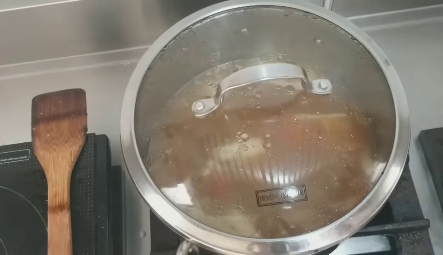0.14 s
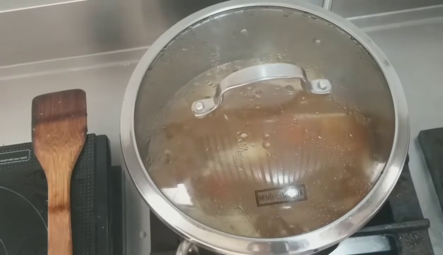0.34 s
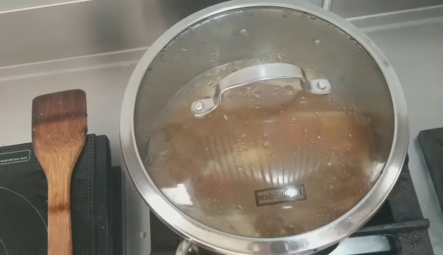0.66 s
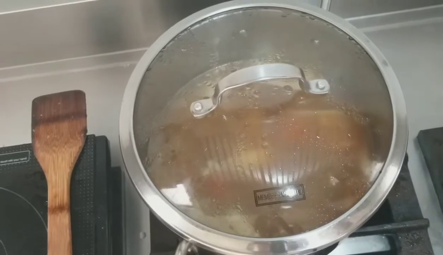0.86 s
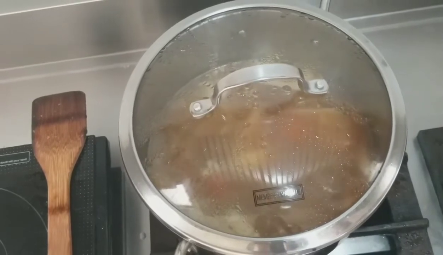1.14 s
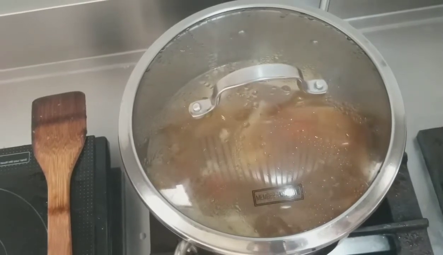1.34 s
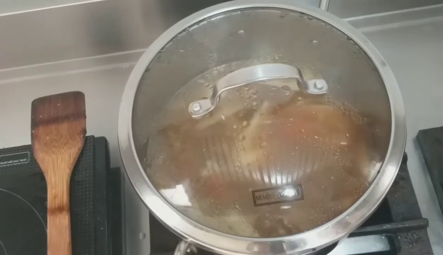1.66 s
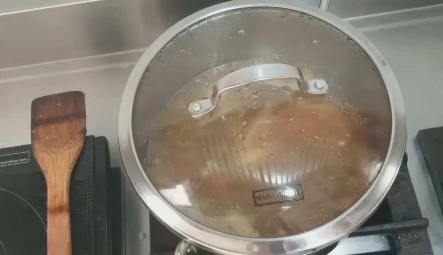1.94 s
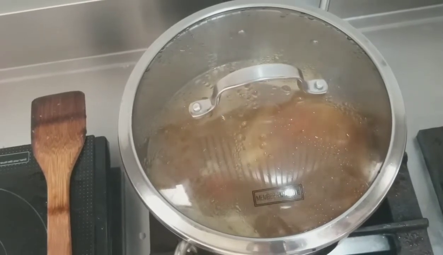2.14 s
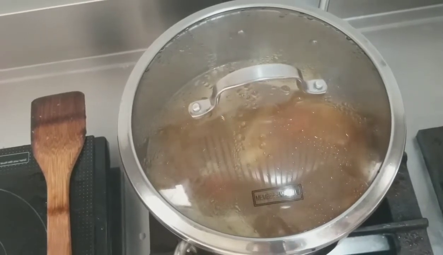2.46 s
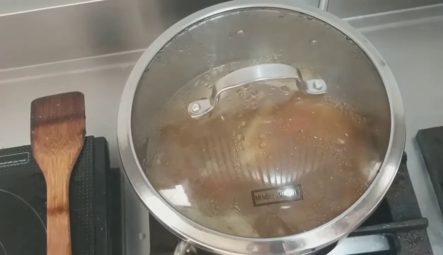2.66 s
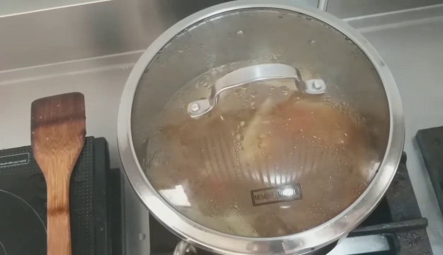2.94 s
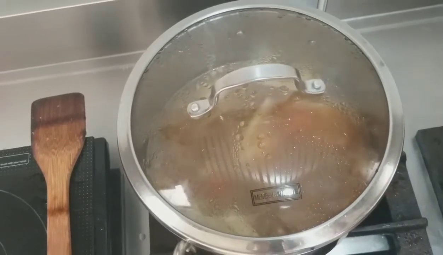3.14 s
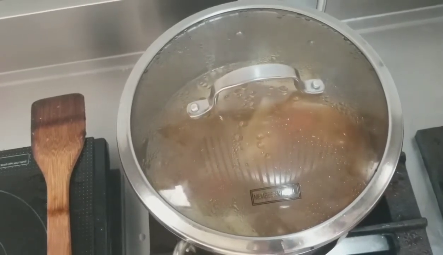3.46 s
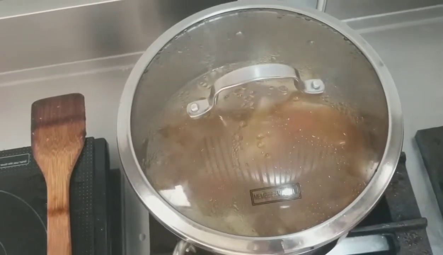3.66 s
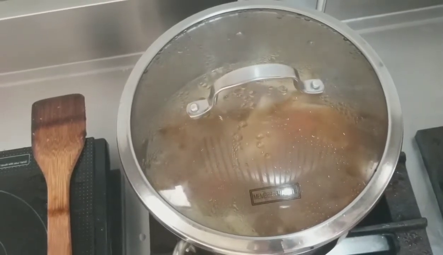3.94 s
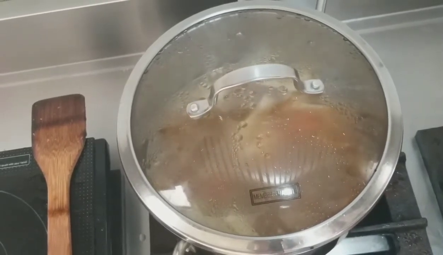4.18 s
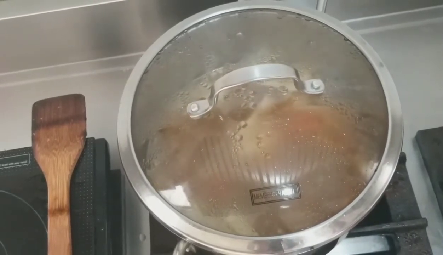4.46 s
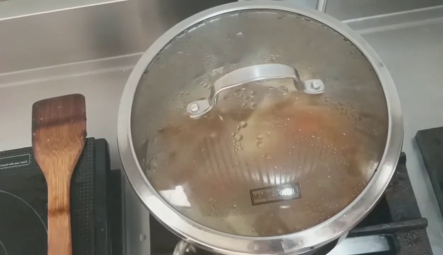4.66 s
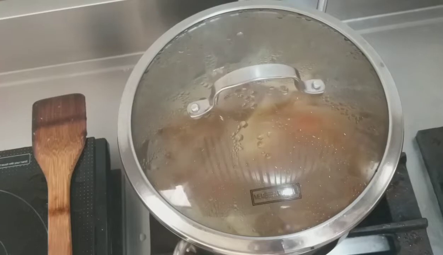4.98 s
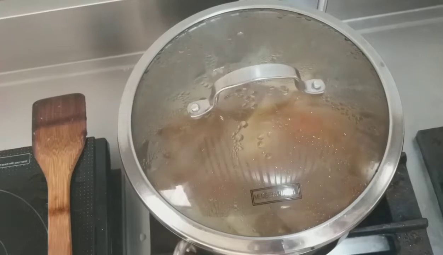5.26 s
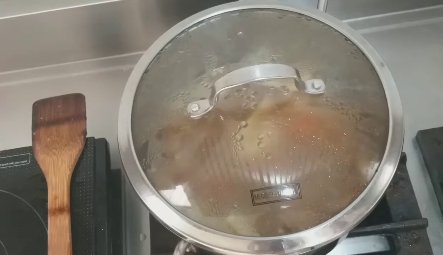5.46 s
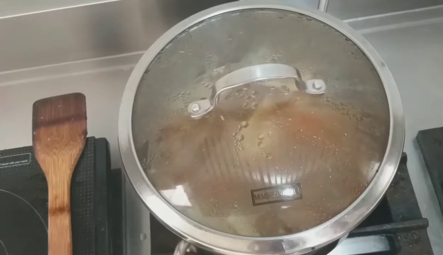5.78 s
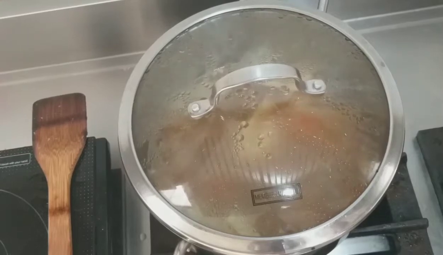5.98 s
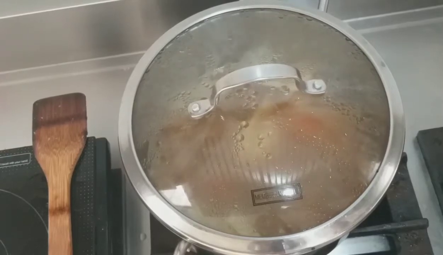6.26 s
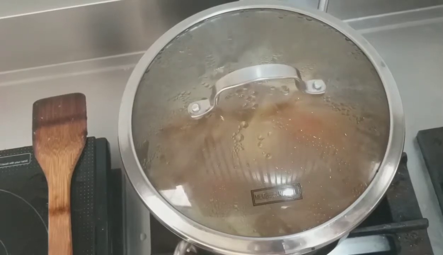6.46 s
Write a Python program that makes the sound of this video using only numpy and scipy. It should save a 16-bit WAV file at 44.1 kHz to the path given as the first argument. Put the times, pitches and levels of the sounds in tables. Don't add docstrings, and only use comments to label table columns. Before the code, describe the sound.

From 0 s a bright, dense sizzle is already at full strength: fish frying in hot oil under a glass lid, heard close by. Thousands of tiny crackles, strongest around 3 to 5 kHz, clump into uneven flurries over fine hiss, with a short ring from the air under the lid. Pops, dry snaps and lower bubble plops scatter throughout; thin, very high ticks mark droplets on the lid. Around 0.5 s a quiet low burner rumble swells, holds unevenly, then fades from about 5.7 s. Frying grows slightly stronger near 2.6 s and eases around 4 s. Sharp spits recur, notably at 2.7, 3.2, 3.55 and 5.6 s, each making the phone microphone duck everything for a few hundredths of a second. Pops cluster at 4.2 to 4.9 s. The frying continues unbroken to the end at about 6.6 s, nearly mono, with little room echo.

```python
import sys
import numpy as np
from scipy import signal
from scipy.fft import rfft, irfft
from scipy.io import wavfile
from scipy.ndimage import uniform_filter1d

SR = 44100
rng = np.random.default_rng(int(sys.argv[2]) if len(sys.argv) > 2 else 0)


def int16_out(signal):
    q = np.round(np.clip(np.atleast_2d(signal).T, -1, 1) * 32767)
    wavfile.write(sys.argv[1], SR, q.astype(np.int16))


def ratio_of_db(decibels):
    return 10 ** (np.asarray(decibels, float) / 20)


N = 291942

# t/s, vigour level/dB, large bubbles rel. level/dB, lid spray rel. level/dB
FRYING = [(0, -15.5, 0.5, -0.1), (0.8, -14.5, 0, -1), (1.2, -15.5, 0.3, .6), (1.9, -15, 0.1, 1.3),
          (2.6, -13.5, -1.6, -1.5), (3.2, -14, -0.7, 1.3), (4.0, -16, 0.5, 1), (4.5, -15.5, -0.2, 1),
          (5.0, -15, -0.2, 0.7), (5.5, -15.5, 1.4, 0.7), (6.1, -15, 0, 1.5), (6.62, -15, -0.3, -1.5)]
# t/s, extra level/dB, length/s
FLURRIES = [(0.377, 2, 0.028), (0.596, 0.5, .03), (0.845, 2, 0.05), (1.282, 2, .03), (1.42, 3, 0.021),
            (1.583, -2, .03), (1.675, -2, 0.03), (2.384, -1, 0.021), (2.487, -2.5, 0.029),
            (2.884, 0, 0.022), (3.023, -2, 0.026), (3.21, 0.5, 0.025), (3.268, -5.5, 0.028),
            (3.45, -2, 0.019), (3.61, -2, .04), (3.747, -1, 0.03), (3.938, 1, 0.021), (4.28, -2, 0.041),
            (4.65, -3.5, .03), (4.783, 2.5, .04), (4.896, -2, 0.019), (5.167, -1.5, 0.022),
            (5.487, 3.5, 0.02), (5.57, 2.5, .03), (5.725, 2.5, .04), (5.795, 1, 0.022), (5.86, -0.5, .03),
            (5.93, 1.5, 0.051), (6.006, -4, 0.026), (6.13, 0, 0.046)]
# f/Hz, density level/dB per Hz
SIZZLE = [(600, -26), (900, -7), (1550, -7.5), (1850, -4), (2150, -8.5), (2800, -9), (3450, 0.5),
          (4000, -2), (4800, -3), (6300, -6.5), (9100, -18), (11200, -8), (12500, -10), (15500, -15.5)]
# t/s, peak level/dB, pitch f/Hz
POPS = [(0.0607, -2, 3540), (0.129, -6, 3770), (0.385, 0, 4500), (0.8525, -4.5, 3430), (0.9562, 0, 3920),
        (1.9246, -5, 5660), (1.9421, -1, 4230), (2.6232, -3, 3600), (2.8096, -1, 4480), (2.9523, -4, 3550),
        (3.6829, -2, 3560), (3.8044, -4.5, 4050), (3.8469, -7, 3730), (4.1851, -1, 4500),
        (4.2187, -5.5, 3820), (4.2624, -0.5, 3500), (4.408, -4.5, 4110), (4.513, -3, 4840),
        (4.5406, -7, 3380), (4.6712, 1, 4400), (4.7275, -2, 4600), (4.8262, 1.5, 4020), (4.8676, 2, 4660),
        (5.032, -4, 3510), (5.1193, -5, 3470), (5.93, -5, 4000), (6.07, -3, 3860), (6.3162, -2.0, 3720),
        (6.3956, -2.5, 3660), (6.452, -4, 5620)]
# t/s, peak level/dB, pitch f/Hz
PLOPS = [(0.0009, 0.5, 2900), (0.3068, 0, 2550), (0.4082, -3.5, 2460), (0.6021, -2, 2720),
         (0.7198, -4, 2520), (0.7824, -7, 2000), (0.8801, -2.5, 2330), (1.0385, -0.5, 2670),
         (1.1485, -3.5, 2290), (1.2715, -1.5, 2100), (1.604, -7, 2550), (1.7259, -5, 2650),
         (1.7959, -2.5, 2640), (2.2873, -4.5, 2760), (2.6863, -7, 2610), (2.8796, -7.5, 1820),
         (3.1912, -5.5, 1740), (3.3355, -6, 2650), (3.4927, -0.5, 2470), (4.1229, -9, 2580),
         (4.833, -6, 2410), (5.0901, -10, 2400), (5.2901, -10.5, 1570), (5.3876, -3.5, 2400),
         (5.6264, -8, 2750), (5.6675, -6.5, 1960), (5.8112, -6, 2730), (6.3222, -7, 2280),
         (6.451, -9.5, 1700), (6.4685, -3.5, 2250)]
# t/s, peak level/dB, pitch f/Hz
SNAPS = [(0.0732, -3, 3640), (0.3086, -2, 6650), (0.6662, -3, 3460), (0.8121, -2.0, 3600),
         (0.8864, -7, 3770), (1.0191, -4, 4900), (1.3367, -6, 2960), (1.3786, 0, 5060), (1.4494, -1, 4370),
         (1.6113, 2, 4030), (1.8272, -2, 3780), (2.1017, 2, 4370), (2.4263, 0, 4310), (2.4407, -7, 4130),
         (2.5734, 1.5, 4500), (2.6435, 3, 4300), (3.1803, -1, 4870), (3.3224, -9, 3680),
         (3.3776, -2.5, 3270), (3.4263, -9, 2990), (3.7437, -8, 3640), (4.0969, -4, 3640),
         (4.4427, -3, 4590), (4.8629, 0.5, 3500), (5.1929, -9, 4960), (5.2901, 0, 5330),
         (5.3089, -10, 3960), (5.3656, -6.5, 3970), (5.5189, 0, 3570), (6.5755, -7, 4080)]
# t/s, peak level/dB, pitch f/Hz
TICKS = [(0.0146, -14, 11920), (0.0832, 0, 11940), (0.4946, -7, 13500), (0.8036, 0, 13020),
         (0.9689, 0, 11370), (1.1045, 7, 11760), (1.2178, 2, 13420), (1.2287, 3, 11400), (1.2527, 0, 13040),
         (1.5643, 0, 12240), (1.621, 1, 12390), (1.6677, -2, 11420), (1.762, -5, 10170),
         (1.9596, 6.5, 10790), (2.2125, 2, 12230), (2.7253, -2, 11180), (2.7549, 4, 12370),
         (3.1205, 4, 11980), (3.4914, -3.0, 12520), (3.9115, -2, 11740), (3.9193, 4, 11100),
         (4.3354, 3, 12720), (5.434, 4, 12510), (5.604, -4, 12200), (5.9929, -4.0, 12700),
         (6.0672, -6, 12300), (6.1221, 1, 12450), (6.2227, -1, 11990), (6.4994, -3, 12510),
         (6.5799, -1, 13030)]
# t/s, overload level/dB, treble share [0-1]
SPITS = [(0.325, 1, 0.3), (0.495, 7.5, 0), (0.5615, 4.3, 0.82), (0.668, 2.5, 0.1), (0.7827, 2.5, 0.3),
         (1.0191, 4, 0.2), (1.169, -1, 0.3), (1.228, 6, 0.7), (1.2875, 2, 0.4), (1.534, 4.5, 0),
         (1.8275, 4.5, 0.6), (2.048, 4.5, 0.4), (2.3927, 4, 0.53), (2.641, 6.5, 0.02), (2.7313, 9, 0.05),
         (3.0313, 7.5, 0.5), (3.234, 8, 0.42), (3.427, 5.5, 0.3), (3.5454, 15.5, 0.3), (4.0968, 5, 0.02),
         (4.19, 5.5, 0.6), (4.549, 4, 0), (4.6694, 7.5, 0.3), (4.846, 2.5, 0), (4.887, 1, 0.12),
         (5.1534, 7, 0.57), (5.573, 10.5, 0.22), (5.8424, 5.5, 0.1), (6.165, 6, 0.21), (6.454, 5.5, 0.3)]
# f/Hz, density level/dB per Hz
RUMBLE = [(18, -56), (30, -39), (59, -43), (84, -4), (113, 5.5), (150, -7.5), (191, 1.5), (305, -9.5),
          (394, -7), (532, -7.5), (649, -8), (900, -19), (1170, -7), (1980, -120)]
# f/Hz, half width/Hz, level/dB
STOVE_MODES = [(112, 7, -9), (183.3, 9.9, -3), (402, 9.1, -12), (533, 15, -8), (776, 12, -4)]
# t/s, extra level/dB, length/s
GUSTS = [(0.95, -1, .1), (1.276, -5.5, 0.099), (1.66, 0.5, 0.1), (1.82, -3, 0.098), (2.19, 5.5, 0.046),
         (2.977, 2.2, .08), (3.7, 0, 0.077), (4.28, -5, 0.071), (4.97, -1, 0.053), (5.45, 3, 0.19),
         (6.0, -3.5, 0.093), (6.315, 5, 0.17)]
# f/Hz, width/Hz, side level/dB
SIDE_BANDS = [(1810, 310, -16), (2340, 1500, -24), (4170, 1900, -27), (9930, 820, -10.5)]


def evened(x):
    return x / np.sqrt(np.mean(x ** 2) + 1e-20)


def read(points, hz):
    f, value = np.transpose(points)
    return np.interp(np.log(hz + 1), np.log(f + 1), value)


def add(mix, s, sound):
    part = mix[round(s * SR):][:len(sound)]
    part += sound[:len(part)]


def swells(t, table):
    return sum(db * np.exp(-((t - s) / length_s) ** 2) for s, db, length_s in table)


def burst(hz, cycles, glide, phase):
    u = np.arange(int(4 * cycles * SR / hz) + 4) * hz / (cycles * SR)
    swell = 2.7 * u * np.exp(1 - 2.7 * u)
    return swell * np.sin(2 * np.pi * cycles * u * (1 + glide * u) + phase)


def under_lid(x, ring_db, t60_s=0.045):
    t = np.arange(1800) / SR
    tail = rng.standard_normal(1800) * ratio_of_db(-60 * t / t60_s) * (t > .0012)
    tail *= ratio_of_db(ring_db) / np.linalg.norm(tail)
    tail[0] = 1
    return signal.fftconvolve(x, tail)


def vigour(hz, t):
    s, *controls = np.transpose(FRYING)
    level_db, large_db, spray_db = (np.interp(t, s, c) for c in controls)
    treble = np.clip(np.log2((hz + 1) / 6500) / .3, 0, 1)
    low = np.clip(np.log2(2800 / (hz + 1)) / .2, 0, 1)
    middle = np.clip(np.log2(4100 / (hz + 1)) / .15, 0, 1) - low
    return level_db + swells(t, FLURRIES) + treble * spray_db + (low + middle) * large_db


def clumps(length_s):
    starts = rng.exponential(1, N) ** 1.5 * (rng.random(N) < .8 / (length_s * SR))
    decaying = signal.lfilter([1], [1, -np.exp(-1 / (length_s * SR))], starts)
    level = uniform_filter1d(np.log(decaying + .6), size=20)
    return evened(level - level.mean())


def crackle(low_hz, high_hz, per_s, cycles, spread_db, clump, ring_db):
    out, power = np.zeros(N), 0
    uneven, chance = clumps(.008), rng.random(N)
    shared, own = np.exp(.6 * clump * uneven), np.exp(.8 * clump * uneven)
    for k, hz in enumerate(np.geomspace(low_hz, high_hz, 14)):
        odds = per_s / 14 / SR * np.exp(-clump ** 2 / 2) * shared * np.roll(own, 9000 * k + 9000)
        at = np.flatnonzero(np.roll(chance, 7919 * k) < odds)
        draw, sign = rng.random((2, N // 40))[:, :len(at)]
        size_db = spread_db * np.minimum(-np.log(draw + 1e-9), 4)
        size = ratio_of_db(size_db) * np.sign(sign - .5)
        shape = under_lid(burst(hz, cycles, 0.017, rng.uniform(0, 2 * np.pi)), ring_db)
        weight = ratio_of_db(read(SIZZLE, hz)) * np.sqrt(hz)
        train_rms = np.sqrt(np.sum(size ** 2) * np.sum(shape ** 2) / N)
        train = np.zeros(N)
        train[at] = size * ratio_of_db(vigour(hz, at / SR)) / train_rms
        out += weight * signal.oaconvolve(train, shape)[:N]
        power += weight ** 2
    return out / np.sqrt(power)


def hiss(patchy_db, flicker_db):
    frames, hz = N // 64 + 5, np.fft.rfftfreq(256, 1 / SR)
    a, b, patches = rng.standard_normal((frames, 129, 3)).T
    noise = a + 1j * b
    patches = uniform_filter1d(patches, size=6, axis=0)
    patches = evened(uniform_filter1d(patches, size=10, axis=1))
    t = np.arange(frames) * 64 / SR
    flicker = np.interp(t, np.arange(N) / SR, clumps(0.017))
    z = noise * ratio_of_db(read(SIZZLE, hz))[:, None] * ratio_of_db(patchy_db * patches + flicker_db * flicker)
    z = z * ratio_of_db(vigour(hz[:, None], t)) / np.sqrt(np.mean(abs(z) ** 2))
    unit = signal.istft(noise, nperseg=256, noverlap=192)[1].std() / np.sqrt(2)
    return signal.istft(z, nperseg=256, noverlap=192)[1][:N] / unit


def single_bubbles(table, cycles, trim_db, glide, ring_db, crack_db):
    out = np.zeros(N)
    for s, db, hz in table:
        sound = burst(hz, cycles, glide, 0)
        add(sound, 0, ratio_of_db(crack_db) * burst(1.38 * hz, 1.0, 0, 0))
        start_s = max(s - cycles / hz / 2.7, 0)
        add(out, start_s, ratio_of_db(db + trim_db) * under_lid(sound, ring_db))
    return out


def spits():
    out = np.zeros(N)
    for s, over_db, treble in SPITS:
        share = np.clip(treble, 0, 1)
        add(out, s - .0001, ratio_of_db(6.0) * np.sqrt(share) * burst(11600, 2.0, 0, 0))
        add(out, s - .0002, ratio_of_db(-9.0) * np.sqrt(1 - share) * burst(3200, 0.7, 0, 0))
    return out


def flame():
    low_db, full_db, end_db = -41.5, -31, -41.5
    up_s, rise_s, down_s, sink_s = .42, 0.12, 5.66, 0.93
    lump_db, lump_s = 1.74, .05
    t = np.arange(0, N + 200, 200) / SR
    corners_s = [up_s, up_s + rise_s, down_s, down_s + sink_s]
    level_db = np.interp(t, corners_s, [low_db, full_db, full_db, end_db])
    draws = rng.standard_normal(N // 500)
    lumps = np.interp(t / lump_s, np.arange(len(draws)), draws)
    return np.interp(np.arange(N) / SR, t, level_db + swells(t, GUSTS) + lump_db * lumps)


def rumble():
    hz = np.fft.rfftfreq(N, 1 / SR)
    colour = ratio_of_db(read(RUMBLE, hz))
    for centre_hz, width_hz, db in STOVE_MODES:
        colour = colour + ratio_of_db(db) / (1 + ((hz - centre_hz) / width_hz) ** 2)
    noise = evened(irfft(rfft(rng.standard_normal(N)) * colour, N))
    return noise * ratio_of_db(flame())


def scene():
    mono = ratio_of_db(-3.0) * crackle(2540, 7220, per_s=800, cycles=1.57, spread_db=3.2, clump=.65, ring_db=-0.48)
    mono += ratio_of_db(-5.5) * crackle(2610, 5390, per_s=130, cycles=6.1, spread_db=2.05, clump=.7, ring_db=1.8)
    mono += ratio_of_db(-6.5) * crackle(7360, 14700, per_s=1900, cycles=3.2, spread_db=3.5, clump=.75, ring_db=-2.0)
    mono += ratio_of_db(-20.5) * crackle(1670, 2880, per_s=45, cycles=4.8, spread_db=3.9, clump=0.43, ring_db=-1.5)
    mono += single_bubbles(POPS, cycles=2.73, trim_db=2.5, glide=0.0054, ring_db=-1.2, crack_db=-8.0)
    mono += single_bubbles(PLOPS, cycles=3.8, trim_db=-3.0, glide=0.039, ring_db=1.5, crack_db=0.53)
    mono += spits()
    mono += single_bubbles(SNAPS, cycles=2.1, trim_db=2.1, glide=0.0049, ring_db=-1.3, crack_db=-9.0)
    mono += single_bubbles(TICKS, cycles=3.1, trim_db=-0.6, glide=0.0082, ring_db=-.6, crack_db=-30.)
    mono += ratio_of_db(-4.0) * hiss(patchy_db=1.06, flicker_db=1.37)
    mono += rumble()
    return np.array([mono, mono])


def roll_off(x):
    return signal.sosfilt(signal.butter(12, 15690, fs=SR, output="sos"), x)


def record(dry):
    since_s, duck_db = np.arange(9000) / SR, np.zeros(N)
    release = (1 - np.exp(-since_s / 0.0023)) * np.exp(-(since_s / 0.052) ** 1.4)
    for s, over_db, treble in SPITS:
        add(duck_db, s + 0.00071, 0.63 * over_db * release)
    mid, side = dry.mean(0) * ratio_of_db(-duck_db), np.zeros(N)
    mid = mid / (1 + abs(mid / .92) ** 8) ** (1 / 8)
    band = signal.firwin(2047, [32, 15510], pass_zero=False, fs=SR)
    mid = signal.oaconvolve(mid, band, "same")
    for sign, (hz, width_hz, db) in zip((1, 1, 1, -1), SIDE_BANDS):
        peak = signal.iirpeak(hz, hz / width_hz / 1.02, SR)
        side += sign * ratio_of_db(db) * signal.filtfilt(*peak, mid)
    return roll_off(np.array([mid + side, mid - side]))


dry = scene()
out = record(dry)
int16_out(out)
```